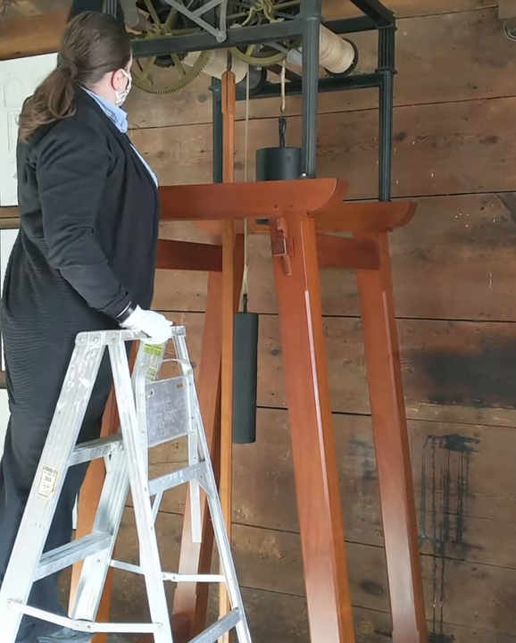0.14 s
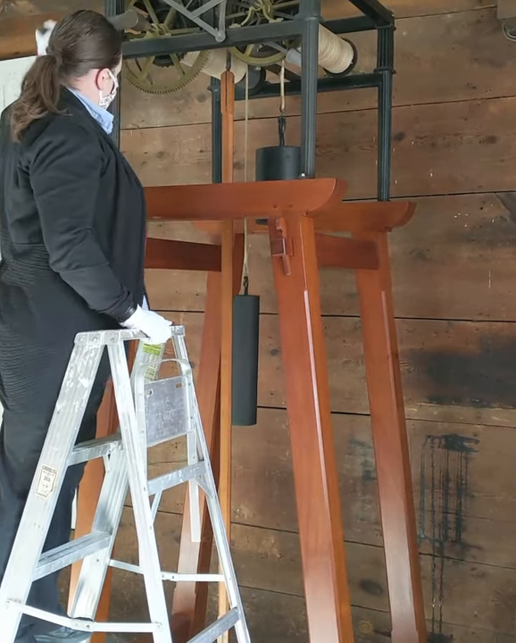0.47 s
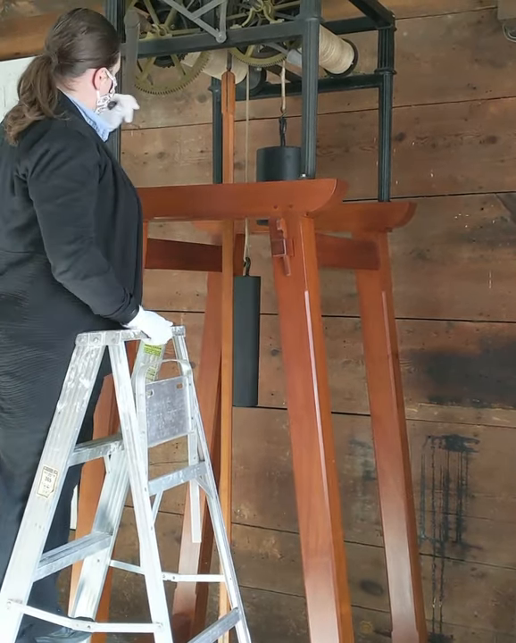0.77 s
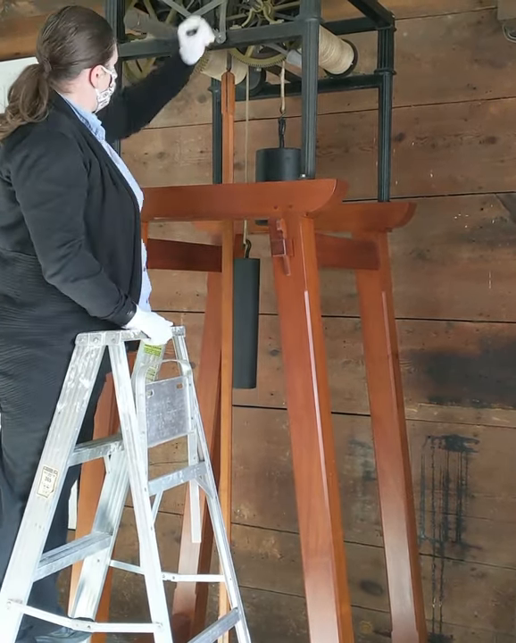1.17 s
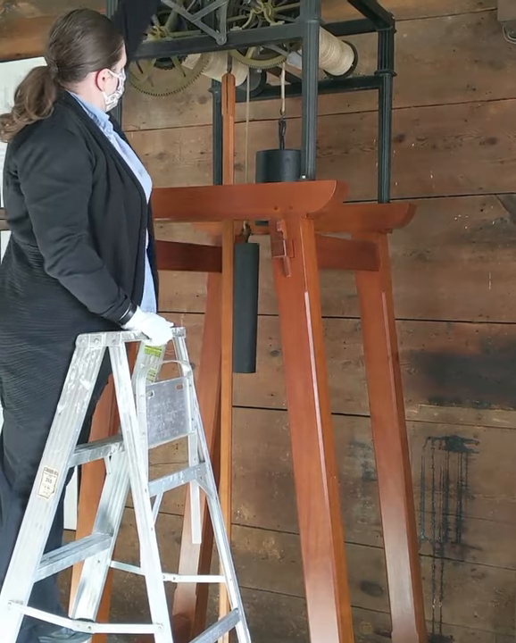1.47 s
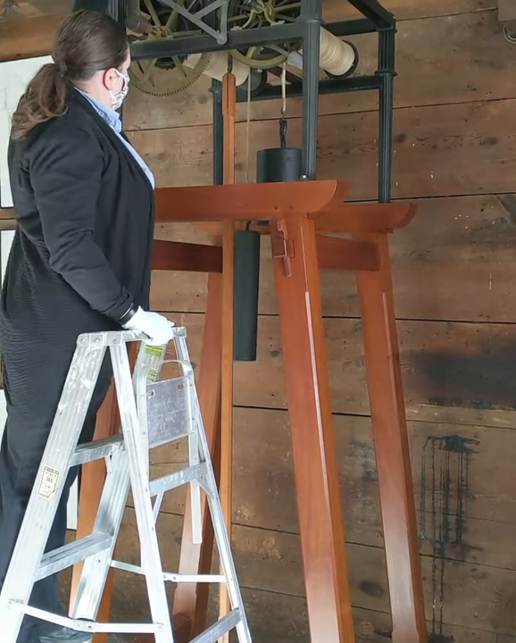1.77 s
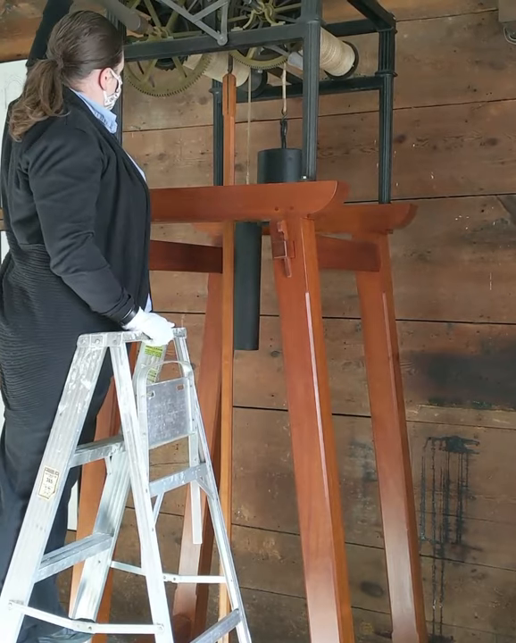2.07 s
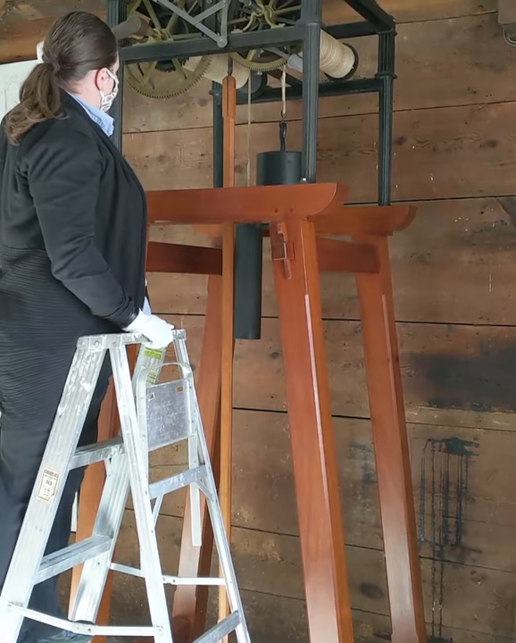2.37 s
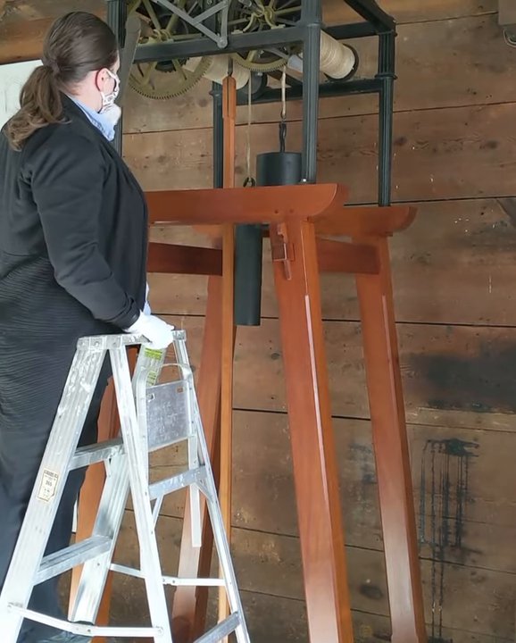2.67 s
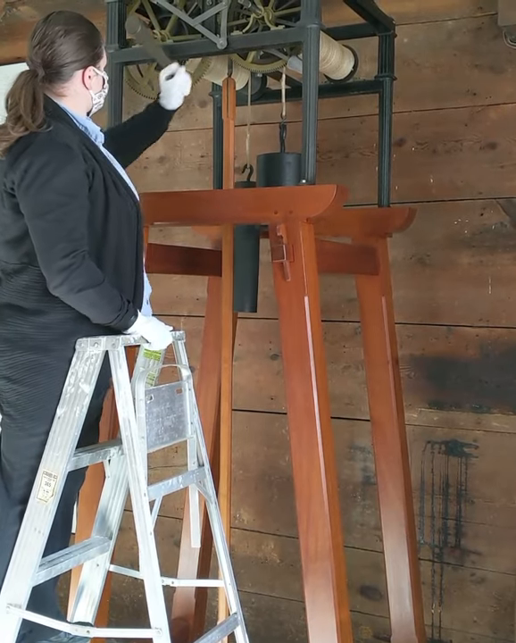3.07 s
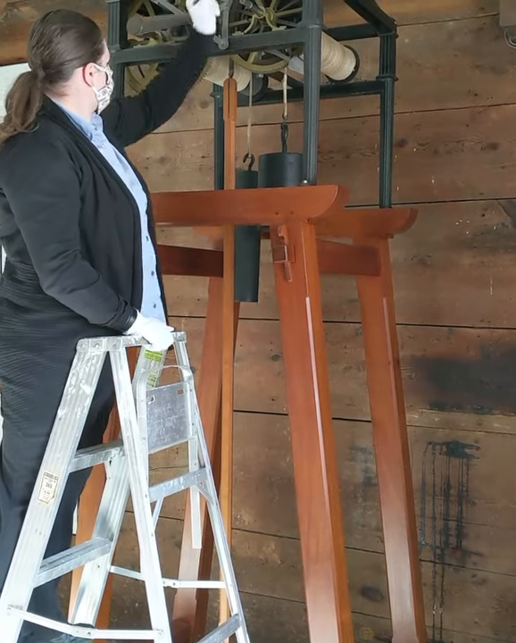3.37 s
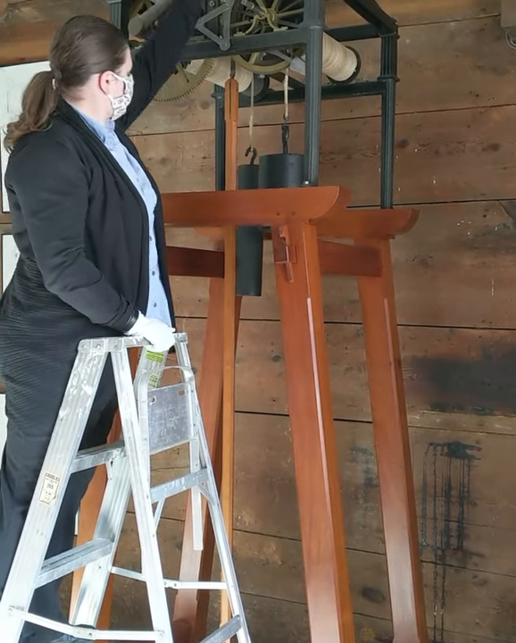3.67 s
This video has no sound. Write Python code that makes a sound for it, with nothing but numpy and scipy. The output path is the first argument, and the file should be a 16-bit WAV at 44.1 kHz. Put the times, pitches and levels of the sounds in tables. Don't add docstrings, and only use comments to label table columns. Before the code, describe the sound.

Fast, harsh ratcheting and gear grinding as someone winds a big mechanical clock in a wooden room

```python
import sys
import numpy as np
from scipy import signal
from scipy.fft import rfft, irfft, next_fast_len
from scipy.io import wavfile
from scipy.ndimage import map_coordinates

SR = 44100
rng = np.random.default_rng(int(sys.argv[2]) if len(sys.argv) > 2 else 0)


def log_audio(samples):
    frames = np.atleast_2d(samples).T
    limited = np.clip(frames, -1, 1)
    pcm = np.round(limited * 32767).astype(np.int16)
    wavfile.write(sys.argv[1], SR, pcm)


def to_linear_factor(level_db):
    exponent = np.asarray(level_db, float) / 20
    return 10 ** exponent


N = 169344
LEAD = SR // 4
M = N + LEAD
T = (np.arange(M) - LEAD) / SR
ALIKE_METAL, ALIKE_FRAME = (0.5, -14), (0.55, 0)


def unit(x):
    return x / np.sqrt(np.mean(x ** 2) + 1e-20)


def along(points, hz):
    f, value = np.transpose(points)
    return np.interp(np.log(hz + 1), np.log(f + 1), value)


def wobble(rate):
    coarse = np.arange(0, M + 64, 64)
    curve = map_coordinates(rng.standard_normal(200), [coarse * rate / SR])
    return np.interp(np.arange(M), coarse, curve)


def filtered(x, response):
    m = next_fast_len(M + SR // 4, True)
    spectrum = rfft(x, m) * response(np.fft.rfftfreq(m, 1 / SR))
    return irfft(spectrum, m)[..., :x.shape[-1]]


def coloured(x, curve):
    return unit(filtered(x, lambda f: to_linear_factor(along(curve, f))))


def mode(f, hz, width):
    return 1j * f * width / (hz * hz - f * f + 1j * f * width)


def contacts(alike):
    per_second, scatter_db, biggest, scrape = 700, 4.5, 2.5, 0.47
    chance = rng.random((2, M))
    size = np.minimum(rng.exponential(size=(2, M)), biggest)
    sign_noise, rub = rng.standard_normal((2, 2, M))
    blows = (chance < per_second / SR) * to_linear_factor(scatter_db * size) * np.sign(sign_noise)
    a, b = unit(unit(blows) * (1 - scrape) + scrape * rub)
    share, lag = alike
    return np.array([a, share * np.roll(a, lag) + np.sqrt(1 - share ** 2) * b])


def ring(drive, pitches, modes, vary_db, rate, alike):
    white = contacts(alike)
    m = next_fast_len(M + SR // 4, True)
    f = np.fft.rfftfreq(m, 1 / SR)
    total = 0
    for k, (hz, (width, db)) in enumerate(zip(pitches, modes)):
        own_contacts = np.roll(white, k * SR // 7, axis=1)
        struck = own_contacts * drive * to_linear_factor(vary_db * wobble(rate))
        total = total + to_linear_factor(db) * mode(f, hz, width) * rfft(struck, m)
    return unit(irfft(total, m)[:, :M]) * np.sqrt(np.mean(drive ** 2))


# (time [s], level [dB], chatter length [s])
FIRST_TURN = [(0.1569, -12, 0.054), (0.2404, -12, 0.087), (0.31, -10.5, 0.052), (0.361, -11.5, 0.046),
              (0.409, -10, 0.046), (0.468, -11, 0.037), (0.527, -11.5, 0.05), (0.586, -10, 0.066),
              (0.644, -10.5, 0.06), (0.709, -11.5, 0.039), (0.735, -10, 0.09), (0.82, -9.5, 0.05),
              (0.872, -10, 0.029), (0.916, -12, 0.05), (0.982, -11, 0.056), (1.058, -10.5, 0.05),
              (1.1244, -9.5, 0.048), (1.1844, -9.5, 0.045), (1.244, -8.5, 0.04), (1.304, -9, 0.05),
              (1.365, -11, 0.037), (1.411, -10.5, 0.055), (1.46, -10.5, 0.067), (1.514, -9.5, 0.071),
              (1.576, -11.5, 0.067), (1.62, -13.5, 0.071), (1.671, -12, 0.057), (1.736, -9.5, 0.05)]
SECOND_TURN = [(1.8135, -11.5, 0.054), (1.8896, -11.5, 0.058), (1.9646, -10, 0.049), (2.033, -12, 0.06),
               (2.111, -14.5, 0.066), (2.193, -12.5, 0.061), (2.273, -12.5, 0.055), (2.3436, -11.5, 0.053),
               (2.4094, -12.5, 0.06), (2.474, -10.5, 0.053), (2.5394, -12, 0.066), (2.6094, -12, 0.063),
               (2.681, -10.5, 0.052), (2.7444, -9.5, 0.053), (2.8176, -13, 0.061), (2.8974, -11.5, 0.047),
               (2.9834, -14, 0.069), (3.0786, -11.5, 0.054), (3.1553, -10.5, 0.064), (3.221, -9.5, 0.05),
               (3.289, -8.5, 0.039), (3.358, -9.5, 0.035), (3.418, -12.5, 0.066), (3.5024, -11.5, 0.053),
               (3.6017, -11, 0.057), (3.72, -11, 0.048)]
TOOTH_BEFORE = (-0.17, -4, 0.074)


def pawl_drops():
    attack_s, release_s = 0.0014, 0.015
    landing_db, landing_s = 0.5, 0.0092
    t = np.arange(SR // 5) / SR
    power = np.zeros(M)
    for start, db, length in [TOOTH_BEFORE, *FIRST_TURN, *SECOND_TURN]:
        rise = 1 - np.exp(-t / attack_s)
        fall = np.exp(-np.maximum(t - length, 0) / release_s)
        shape = rise * fall * to_linear_factor(landing_db * np.exp(-t / landing_s))
        part = power[round(start * SR) + LEAD:][:len(t)]
        part += (to_linear_factor(db) * shape[:len(part)]) ** 2
    return np.sqrt(power)


# (width [Hz], level [dB])
WHEEL_PITCHES = [2190, 2802, 3100, 3352, 3470, 4032, 4360, 5100, 5480, 5572, 5820, 5900, 6300, 7810]
WHEEL_MODES = [(110, -18), (12, -5), (60, -15), (14, 0), (9, 6), (13, 3), (130, -14), (90, -11), (25, -10),
               (25, -7), (90, -7), (150, -6), (33, -14), (62, -12)]


def wheel(drive):
    return to_linear_factor(-12) * ring(drive, WHEEL_PITCHES, WHEEL_MODES, 0.62, 9, ALIKE_METAL)


def wheel_singing(drive):
    hz, db, decay_s = 3470, -16, 0.02
    fade = np.exp(-np.arange(SR // 4) / SR / decay_s)
    level = signal.fftconvolve(drive, fade / fade.sum())[:M] * to_linear_factor(db + 1.33 * wobble(14))
    drift = 1.3 * wobble(16) + 0.6 * np.array([wobble(8), wobble(8)])
    return level * np.sin(2 * np.pi * hz * T + drift)


# (width [Hz], level [dB])
PAWL_PITCHES = [8555, 8620, 9050, 9642, 11650, 11990, 12408, 12465, 12530, 13012, 13053, 13078, 13204,
                15400]
PAWL_MODES = [(20, -5), (59, 2), (30, -2), (16, -3.5), (80, 0.5), (50, 2), (30, 2.5), (40, -6), (65, 1),
              (30, -5), (30, 0), (22, 3), (55, 4), (150, -16)]


def pawl(drops):
    return to_linear_factor(-9.5) * ring(drops, PAWL_PITCHES, PAWL_MODES, 2.5, 11, ALIKE_METAL)


# (frequency [Hz], level [dB])
CLATTER_COLOUR = [(1500, -40), (2600, -12), (4200, -4), (6000, -3.5), (7200, -4.5), (9000, -5.5),
                  (12500, -4.5), (15700, -10.5)]


def clatter(drops):
    return to_linear_factor(-7.5) * coloured(contacts(ALIKE_METAL), CLATTER_COLOUR) * drops


# (time [s], level [dB])
CRANK_EFFORT = [(-.25, -6), (-.03, 2.5), (-.01, -42), (.15, -22), (.17, -1), (.35, 0.5), (.8, 1),
                (1.0, -0.5), (1.6, 2), (1.9, 0), (2.3, -2.5), (2.78, 1), (3.0, -2), (3.35, 2.5), (3.55, -2),
                (3.75, -1.5), (3.84, -7.5)]


def crank():
    return to_linear_factor(np.interp(T, *np.transpose(CRANK_EFFORT)))


# (frequency [Hz], level [dB])
GRIND_COLOUR = [(120, -104), (200, -4), (450, -12), (1200, 0), (2000, -6.5), (3500, -3.5), (6000, -22.5),
                (14000, -27.5)]


def gear_train(effort):
    rubbing = coloured(contacts(ALIKE_FRAME), GRIND_COLOUR)
    return to_linear_factor(-34.5) * rubbing * effort * to_linear_factor(2.2 * wobble(12))


# (width [Hz], level [dB])
FRAME_PITCHES = [210, 250, 335, 550, 800, 1200, 1334, 1750, 2200]
FRAME_MODES = [(23.7, -5), (30, -5.5), (69, 1.5), (54.6, 3.5), (99, 2.5), (240, -5), (37.8, -8), (87, 2.5),
               (100, -13)]


def frame(effort):
    return to_linear_factor(-40.5) * ring(effort, FRAME_PITCHES, FRAME_MODES, 2.6, 3.004, ALIKE_FRAME)


# (frequency [Hz], width [Hz], depth [0-1])
SWALLOWED = [(4800, 330, .6), (6780, 420, .8), (7350, 250, .5), (10450, 400, .35), (14750, 500, .15),
             (4220, 100, .5)]


def swallow(f):
    return np.prod([1 - depth * mode(f, hz, width) for hz, width, depth in SWALLOWED], axis=0)


def movement():
    drops, effort = pawl_drops(), crank()
    gears_on_wheel = 0.42 * effort * np.median(drops)
    both = np.hypot(drops, gears_on_wheel)
    metal = wheel(both) + pawl(drops) + clatter(drops) + wheel_singing(both)
    return filtered(metal + gear_train(effort), swallow) + frame(effort)


# (frequency [Hz], time to fall by 60 dB [s])
ROOM_DECAY = [(150, 0.2), (1000, 0.72), (3000, 0.34), (8000, 0.39), (15000, 0.098)]


def room(x):
    noise = rng.standard_normal((3, SR // 2))
    hz, t, z = signal.stft(noise, SR, nperseg=256)
    z = z[:2] + z[2] * to_linear_factor(7) / (1 + (hz[:, None] / 450) ** 2)
    fall = to_linear_factor(-60 * t / along(ROOM_DECAY, hz)[:, None])
    tail = signal.istft(z * fall, SR, nperseg=256)[1]
    echoes = signal.fftconvolve(x, tail / np.linalg.norm(tail[0]), axes=1)[:, :M]
    return to_linear_factor(-5) * echoes


# (frequency [Hz], level [dB])
LEFT_OVER_RIGHT = [(100, 18), (250, -4), (600, 3), (1200, -0.5), (3000, 2.5), (6000, 1.5), (13000, 4.5)]


def lean(f):
    return to_linear_factor(np.array([[0.5], [-0.5]]) * along(LEFT_OVER_RIGHT, f))


# (frequency [Hz], level [dB per Hz])
AIR_COLOUR = [(12, -50), (35, -12), (72, 3), (120, -8), (160, -20.5), (800, -12), (3000, -32),
              (13000, -48.5)]


def air():
    noise = rng.standard_normal((3, M))
    return to_linear_factor(-57 + 3.1 * wobble(6)) * coloured(noise[:2] + 1.6 * noise[2], AIR_COLOUR)


def scene():
    clock = movement()
    near = filtered(clock + room(clock), lean)
    return (near + air())[:, LEAD:]


def band_limit(x):
    return signal.sosfilt(signal.butter(12, 16670, fs=SR, output="sos"), x)


def record(dry):
    ceiling, knee = 0.8, 4
    top_hz, edge_hz = 15720, 30
    held = dry / (1 + np.abs(dry / ceiling) ** knee) ** (1 / knee)
    mix = filtered(held, lambda f: 0.5 - 0.5 * np.tanh((f - top_hz) / edge_hz))
    return band_limit(mix)


dry = scene()
out = record(dry)
log_audio(out)
```